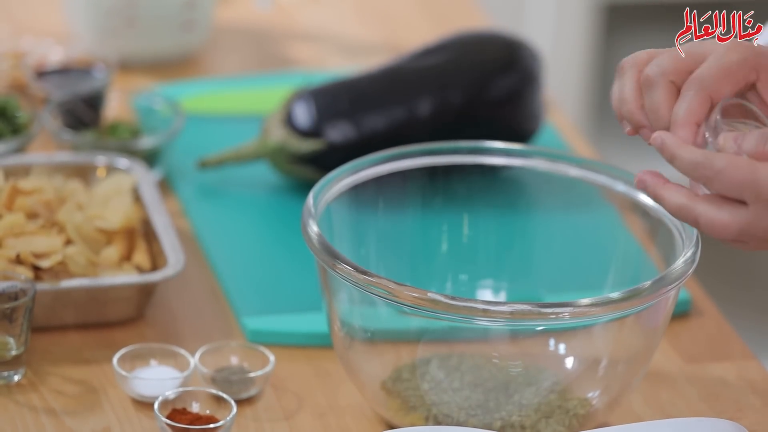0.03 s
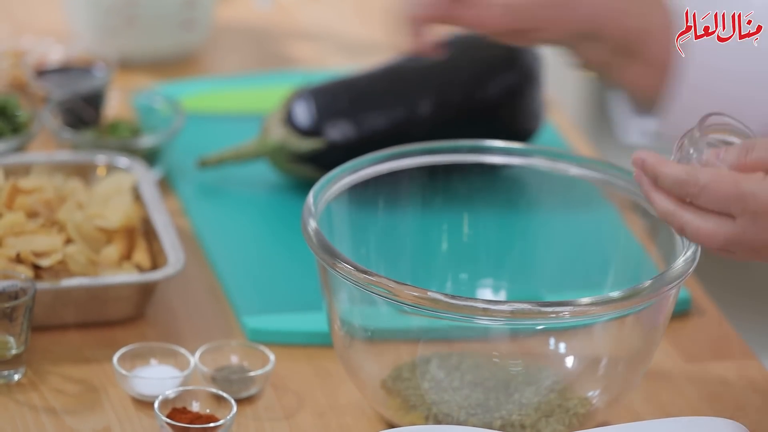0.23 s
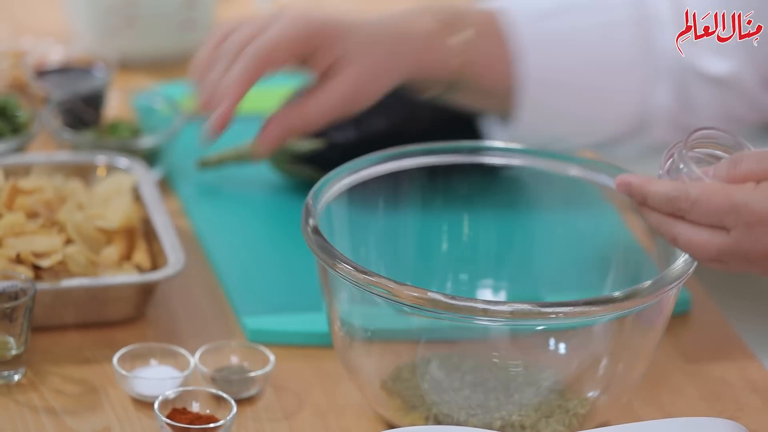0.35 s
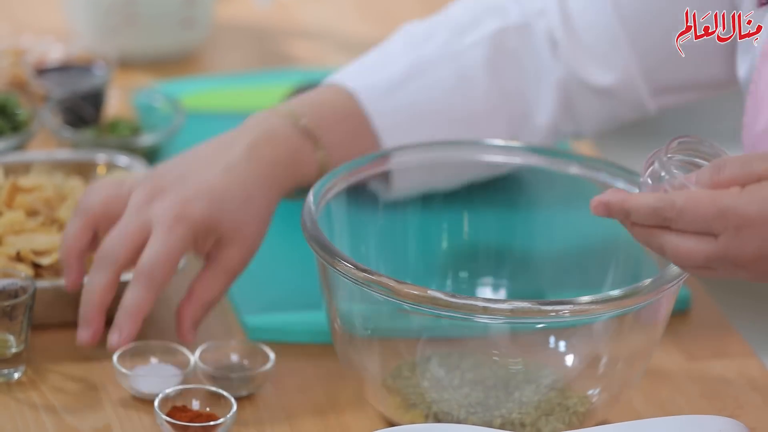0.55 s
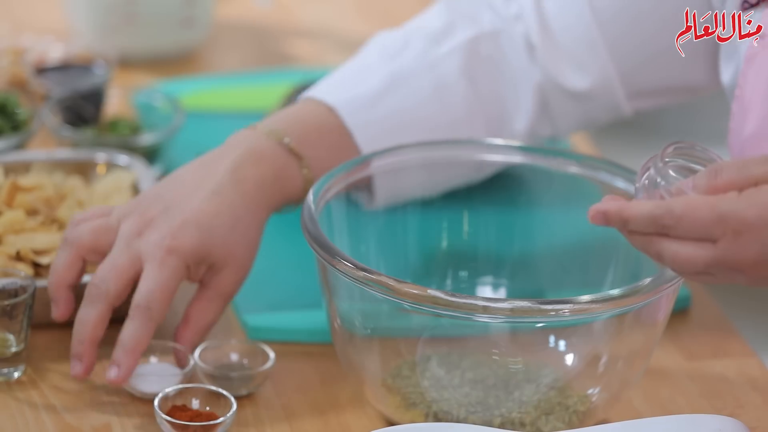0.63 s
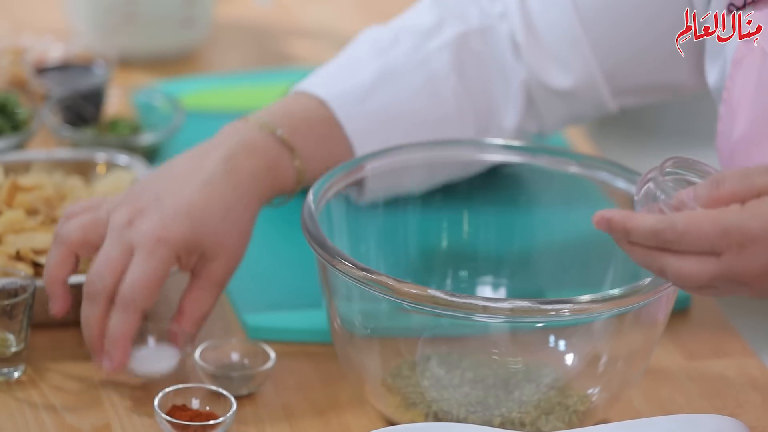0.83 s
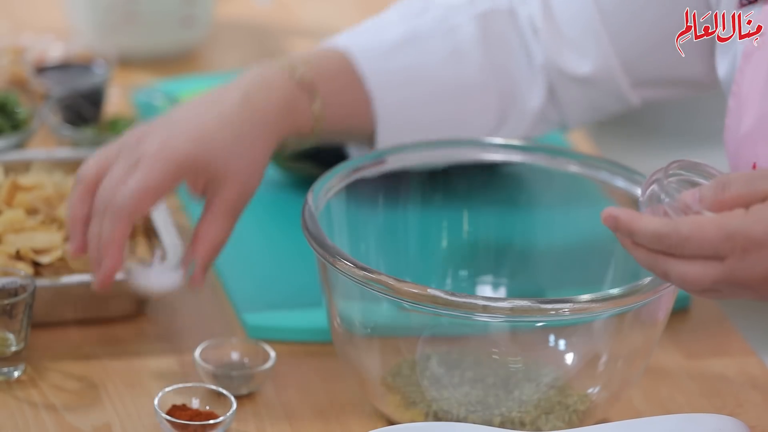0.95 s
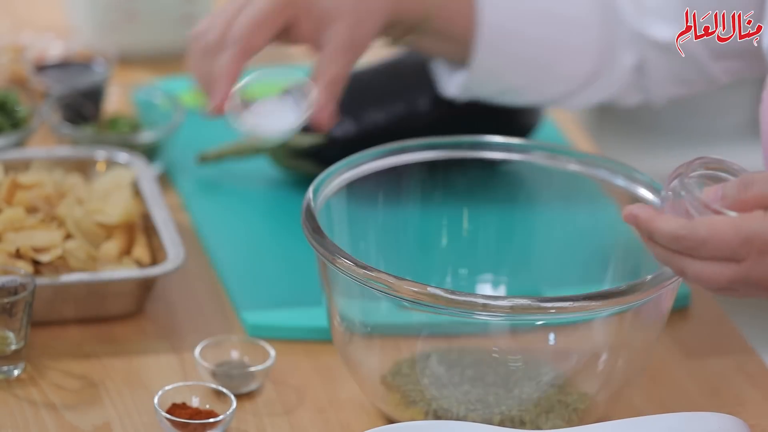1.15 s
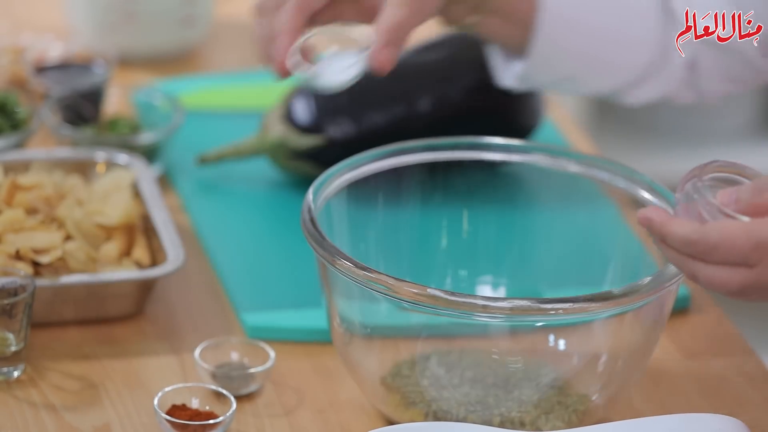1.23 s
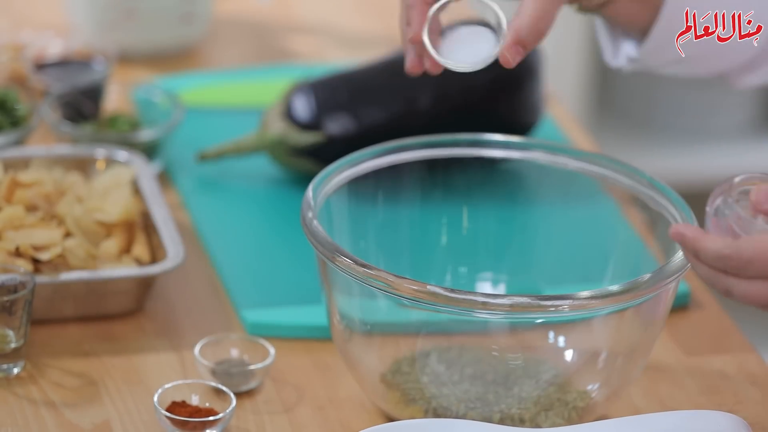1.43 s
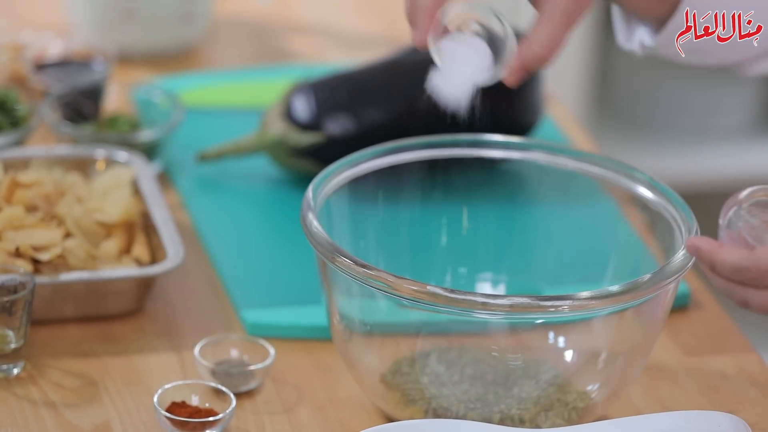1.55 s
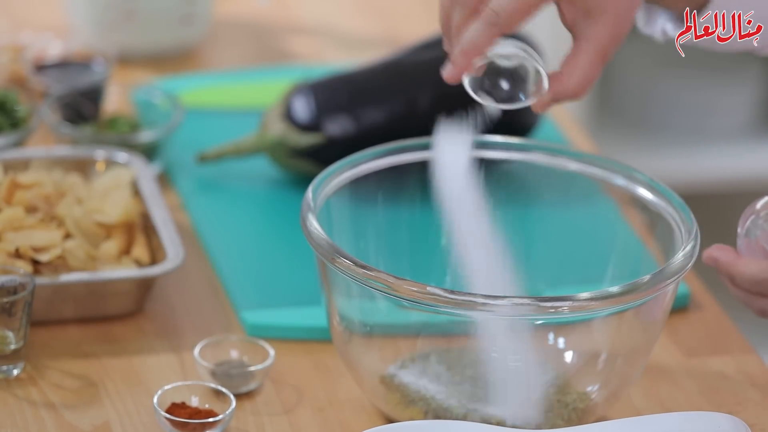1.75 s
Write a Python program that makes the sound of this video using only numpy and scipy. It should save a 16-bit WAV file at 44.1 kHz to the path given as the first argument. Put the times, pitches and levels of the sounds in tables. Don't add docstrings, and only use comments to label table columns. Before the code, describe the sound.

Close up in a quiet kitchen, glass bowls clack sharply and are damped at once by fingers, settle with a softer clack, then a small bowl rattles faintly off wood, followed by sleeve rustle and soft low bumps.

```python
import sys
import numpy as np
from scipy import signal
from scipy.io import wavfile
from scipy.ndimage import uniform_filter1d

SR = 44100
rng = np.random.default_rng(int(sys.argv[2]) if len(sys.argv) > 2 else 0)


def nominal_scale(level):
    x = np.asarray(level, float) / 20
    return 10 ** x


def persist_wave(psi):
    counts = np.round(np.clip(psi, -1, 1) * 32767).astype(np.int16)
    wavfile.write(sys.argv[1], SR, np.atleast_2d(counts).T)


N = 79380
LEAD = SR // 4
GRIP_S, AWAY_GRIP_S, GRIP_DB_PER_S = 0.0062, 0.0032, 8998


def evened(x):
    return x / np.sqrt(np.mean(x ** 2) + 1e-20)


def read(points, hz):
    point_hz, value = np.transpose(points)
    return np.interp(np.log(hz + 1), np.log(point_hz + 1), value)


def silence():
    return np.zeros(N + LEAD)


def add(mix, start_s, sound):
    part = mix[LEAD + round(start_s * SR):][:len(sound)]
    part += sound[:len(part)]


def ring(modes, level_db, grip_s=1, rise_s=0.00024):
    t = np.arange(SR // 2) / SR
    pitch_hz, mode_db, t60_s = np.transpose(modes)[:, :, None]
    tones = nominal_scale(mode_db - 60 * t / t60_s) * np.sin(2 * np.pi * pitch_hz * t)
    grip_db = np.maximum(-GRIP_DB_PER_S * np.maximum(t - grip_s, 0), -200)
    return nominal_scale(level_db + grip_db) * np.minimum(t / rise_s, 1) * tones.sum(axis=0)


def burst(noise, level_db, t60_s):
    return nominal_scale(level_db - 60 * np.arange(len(noise)) / SR / t60_s) * noise


def hiss(spectrum, patchy_db):
    frames, hz = N // 256 + 5, np.fft.rfftfreq(1024, 1 / SR)
    real, imag, patches = rng.standard_normal((frames, 513, 3)).T
    patches = uniform_filter1d(patches, size=8, axis=0)
    patches = evened(uniform_filter1d(patches, size=8, axis=1))
    level_db = read(spectrum, hz)[:, None] + patchy_db * patches
    z = (real + 1j * imag) * nominal_scale(level_db)
    return evened(signal.istft(z, nperseg=1024, noverlap=768)[1][:N])


# pitch_hz, level_db_per_hz
HUM_SPECTRUM = [(18, -11), (45, 0.5), (250, -2.5), (600, -7.5), (1200, -16.5), (2500, -20), (5000, -27),
                (16000, -32.5)]


def ventilation():
    return nominal_scale(-61) * hiss(HUM_SPECTRUM, patchy_db=1.4)


# pitch_hz, level_db_per_hz
RUSTLE_SPECTRUM = [(100, -2), (300, 2), (700, -7.5), (2000, -14), (4000, -25), (9000, -31.5)]
# time_s, level_db
SLEEVE_MOTION = [(0, -70), (.6, -60.5), (.8, -72.5), (0.898, -68.5), (1.1, -66), (1.22, -60), (1.45, -60),
                 (1.6, -68.5), (1.8, -74)]


def sleeve():
    time_s, level_db = np.transpose(SLEEVE_MOTION)
    motion = nominal_scale(np.interp(np.arange(N) / SR, time_s, level_db))
    return motion * hiss(RUSTLE_SPECTRUM, patchy_db=2.8)


# pitch_hz, t60_s
ROOM_DECAY = [(300, 0.23), (1500, 0.95), (3000, 0.75), (6000, 0.82), (12000, 0.44), (15000, 0.18)]
# delay_s, level_db
EARLY_ECHOES = [(.0085, -31), (.0135, -28.5), (.0165, -34), (.0285, -31.5)]


def kitchen(near, away):
    taps, early = np.zeros((2, SR))
    at = np.arange(0, SR - 20, 20)
    taps[at + rng.integers(0, 20, at.shape)] = rng.choice([-1., 1.], at.shape)
    hz, t, z = signal.stft(taps, SR, nperseg=256)
    decay = nominal_scale(-60 * t / read(ROOM_DECAY, hz)[:, None])
    tail = signal.istft(z * decay, SR, nperseg=256)[1][:SR]
    tail_start_s = 0.022
    tail = tail * np.clip(np.arange(SR) / SR / tail_start_s - .5, 0, 1)
    tail = nominal_scale(-25) * tail / np.linalg.norm(tail)
    for delay_s, level_db in EARLY_ECHOES:
        early[round(delay_s * SR)] = nominal_scale(level_db)
    return (signal.fftconvolve(near, early) + signal.fftconvolve(away, tail))[:len(near)]


# start_s, level_db, pitch_hz
COUNTER_BUMPS = [
    (1.204, -49, 58.4),
    (1.745, -47, 41.8),
    (1.774, -49.5, 36.1),
]


def bumps():
    out = silence()
    for start_s, level_db, pitch_hz in COUNTER_BUMPS:
        add(out, start_s, ring([(pitch_hz, 0, 0.071)], level_db, rise_s=0.0045))
    return out[LEAD:]


# start_s, level_db, pitch_hz
TINY_TICKS = [(0.118, -49.5, 1900), (.535, -53.5, 2600), (.913, -59.5, 2200), (.939, -52, 2110),
              (1.012, -71, 2970), (1.299, -62, 3000), (1.549, -67, 4700), (1.618, -57.5, 1288)]
# pitch_ratio, level_db, t60_s
TICK_PARTS = [(0.94, 8.5, 0.0087), (1.23, -8, .005), (.75, -11, 0.007), (2.1, -11, .003)]


def ticks():
    near = silence()
    for start_s, level_db, pitch_hz in TINY_TICKS:
        modes = [(pitch_hz * ratio, part_db, t60_s) for ratio, part_db, t60_s in TICK_PARTS]
        add(near, start_s, ring(modes, level_db))
    return near


# pitch_hz, level_db, t60_s
PALM_MODES = [(726, 6, 0.016), (426, -4.5, .015), (170, -0.5, 0.014), (540, 9, 0.0076)]
# start_s, level_db
PALM_THUDS = [
    (.2076, -35.5),
    (.4553, -52),
]


def palm():
    near = silence()
    for start_s, level_db in PALM_THUDS:
        add(near, start_s, ring(PALM_MODES, level_db, rise_s=.001))
    return near


# pitch_hz, level_db, t60_s
EARLIER_MODES = [(1577, -5.5, 0.018), (1830, 2, 0.021), (2200, -4, 0.013), (2546, -6.5, 0.01),
                 (3914, -13.5, .015), (4220, -2.5, 0.072), (5000, -14, 0.012), (7101, -20, 0.014),
                 (9350, -8.5, .025), (10000, -17, .008)]


def earlier_clack():
    away = silence()
    add(away, -.04, ring(EARLIER_MODES, -13, AWAY_GRIP_S))
    return away


# start_s, level_db
HARD_CRACKS = [
    (-.04, -26),
    (0.207, -23),
]


def cracks():
    away = silence()
    for start_s, level_db in HARD_CRACKS:
        add(away, start_s, burst(np.diff(rng.standard_normal(401)), level_db, t60_s=.008))
    return away


# pitch_hz, level_db, t60_s
FREE_MODES = [(4852, 0, .1), (4826, -10, .14), (4597, -6, .08), (4540, -12, .07), (4700, -13, .05),
              (4950, -14, .05), (11290, -15, .15), (11180, -24, .06)]
# pitch_hz, level_db, t60_s
KNOCK_MODES = [(2920, 9, 0.0042), (6200, 2.5, 0.0039), (7200, 3, 0.0028), (12600, -4, 0.0036),
               (477.6, -3.5, 0.088), (530, -13, .02), (989, -9.5, 0.075), (690, -6.5, 0.047),
               (1900, -9.5, 0.014), (14000, -14, 0.0038)]
# start_s, ring_db, knock_db
LIFT_CHATTER = [
    (0.8188, -42, -39),
    (0.8244, -66, -40.5),
    (0.8309, -67, -49),
    (.8378, -45.5, -47.5),
    (.8425, -62, -58),
]
# start_s, level_db, pitch_hz
TIP_NUDGE = [
    (.8128, -44, 530),
]


def table_bowl():
    glass, wood = silence(), silence()
    for start_s, ring_db, knock_db in LIFT_CHATTER:
        add(glass, start_s, ring(FREE_MODES, ring_db))
        add(wood, start_s, -ring(KNOCK_MODES, knock_db, rise_s=0.00095))
    for start_s, level_db, pitch_hz in TIP_NUDGE:
        add(wood, start_s, ring([(pitch_hz, 0, .031)], level_db, rise_s=0.00078))
    return glass + wood, nominal_scale(14) * glass + nominal_scale(13.5) * wood


def small_body(x):
    return signal.sosfilt(signal.butter(6, 1237, "high", fs=SR, output="sos"), x)


# pitch_hz, level_db, t60_s
STACK_MODES = [(1272, -14, 0.075), (1526, 8, 0.012), (1864, 5, 0.004), (2500, -24, 0.024),
               (3150, -34, .007), (4150, -20, 0.018), (4650, -22, 0.017), (6290, -19.5, 0.012),
               (7160, -36, 0.011), (9300, -32, 0.0078)]


def settling_stack():
    near, away = silence(), silence()
    start_s = .4551
    add(near, start_s, -ring(STACK_MODES, -24, GRIP_S, rise_s=0.00039))
    add(away, start_s, ring(STACK_MODES, -28.5, AWAY_GRIP_S))
    return small_body(near), away


# pitch_hz, level_db, t60_s
CUP_MODES = [(1250, -28, .03), (1426, -12.5, .03), (1820, -5, .03), (2180, 2, .025), (2479, -4, .03),
             (2736, -0.5, 0.014), (2900, -13.5, 0.0067), (3350, -16.5, .02), (3890, -23.5, 0.0067)]
RIM_PITCHES = [4132, 4615, 5010, 5316, 5565, 6115, 7250, 7950, 9181, 9995, 10268, 12040, 13400, 13900]
# level_db, t60_s
RIM_DECAYS = [(-17.5, 0.053), (-14, 0.12), (-6, 0.047), (-22.5, .031), (-29, 0.036), (-31.5, .03),
              (-20, 0.018), (-25.5, .012), (-22.5, .021), (-21.5, 0.015), (-15.5, 0.029), (-23.5, 0.011),
              (-26.5, 0.014), (-23, 0.013)]
# pitch_hz, level_db, t60_s
AWAY_MODES = [(1690, -6, 0.0071), (1944, 0.5, 0.0057), (2288, -2.5, 0.019), (2670, -1, .008),
              (4200, -12.5, .012), (4940, -8, .01), (7231, -19, 0.011), (7940, -17, 0.028),
              (8900, -17.5, .012), (10017, -12, .014), (12150, -14.5, .012), (14000, -22.5, .006)]
# start_s, cup_db, rim_db
CLACK_CONTACTS = [
    (.2075, -6, -14),
    (.2085, -26, -8.5),
    (.2096, -23.5, -10),
    (.2112, -27, -12.5),
]


def hard_clack():
    near, away = silence(), silence()
    rim_modes = np.column_stack([RIM_PITCHES, RIM_DECAYS])
    blow_s = CLACK_CONTACTS[0][0]
    for start_s, cup_db, rim_db in CLACK_CONTACTS:
        grip_s = blow_s + GRIP_S - start_s
        add(near, start_s, ring(CUP_MODES, cup_db, grip_s, rise_s=0.00039))
        add(near, start_s, ring(rim_modes, rim_db, grip_s))
    grit = uniform_filter1d(rng.standard_normal(400), size=2)
    add(near, CLACK_CONTACTS[1][0], burst(grit, -31.5, t60_s=0.017))
    add(away, blow_s, ring(AWAY_MODES, -5.5, AWAY_GRIP_S))
    return small_body(near), away


def scene():
    table_near, table_away = table_bowl()
    stack_near, stack_away = settling_stack()
    clack_near, clack_away = hard_clack()
    near = ticks() + palm() + table_near + stack_near + clack_near
    away = earlier_clack() + cracks() + table_away + stack_away + clack_away
    contacts = (near + kitchen(near, away))[LEAD:]
    return (ventilation() + sleeve() + bumps() + contacts)[None]


def band_limit(x):
    return signal.sosfilt(signal.butter(12, 16410, fs=SR, output="sos"), x)


def record(dry):
    edge = signal.firwin(255, 16050, window=("kaiser", 9), fs=SR)
    mix = signal.oaconvolve(dry, edge[None], "same")
    return band_limit(mix)


dry = scene()
out = record(dry)
persist_wave(out)
```